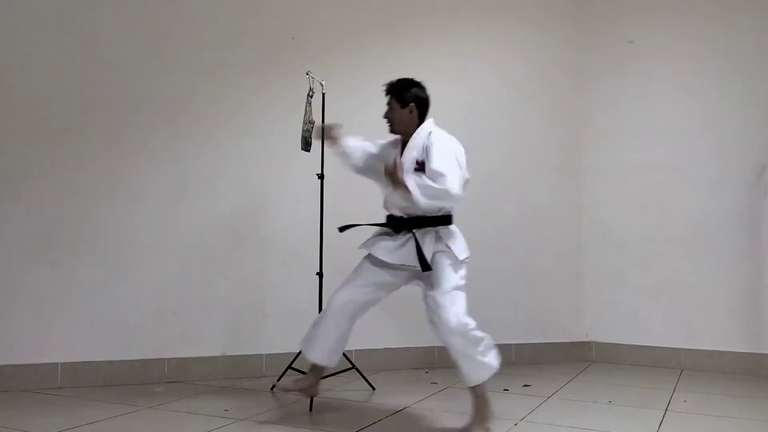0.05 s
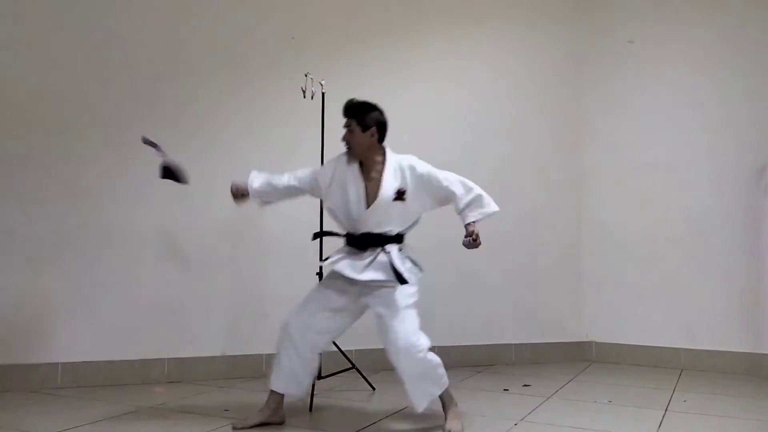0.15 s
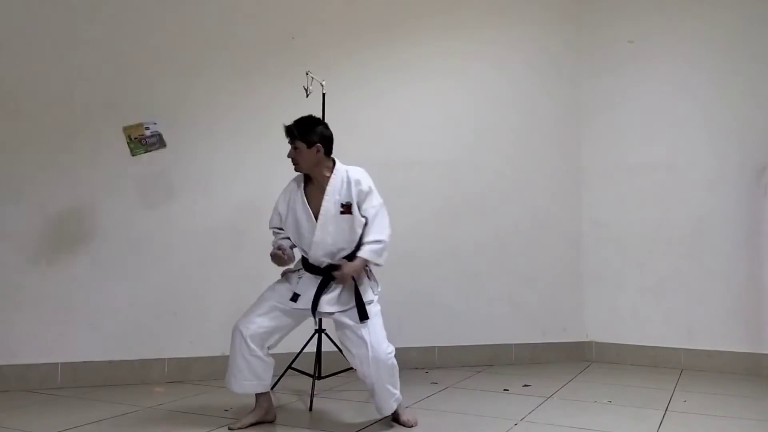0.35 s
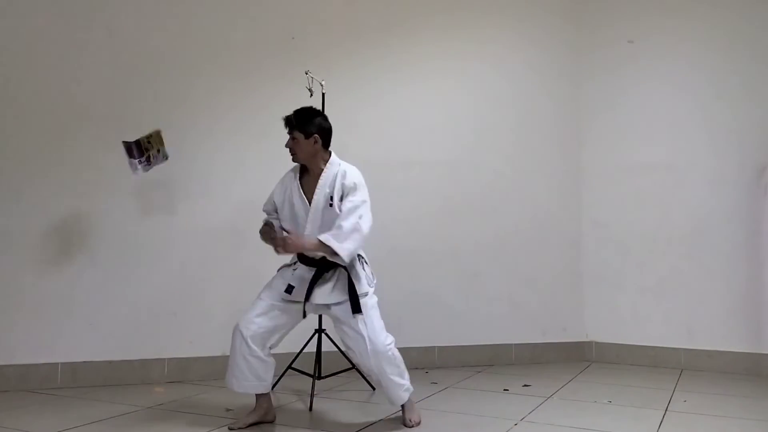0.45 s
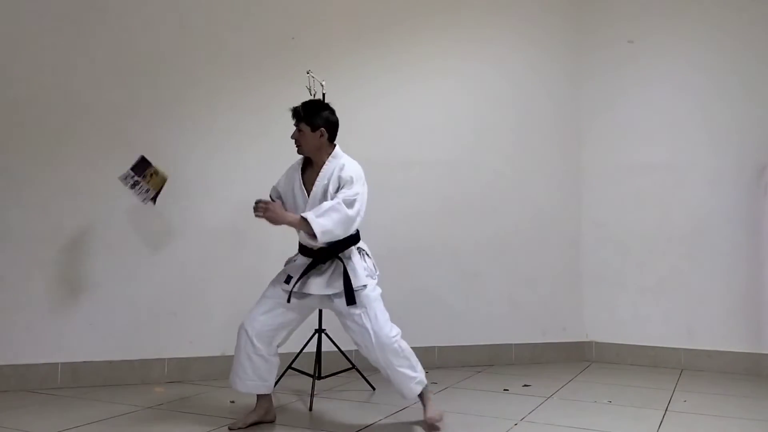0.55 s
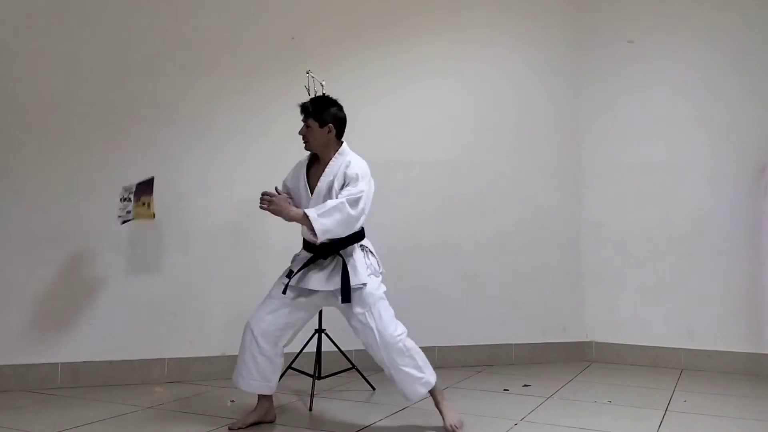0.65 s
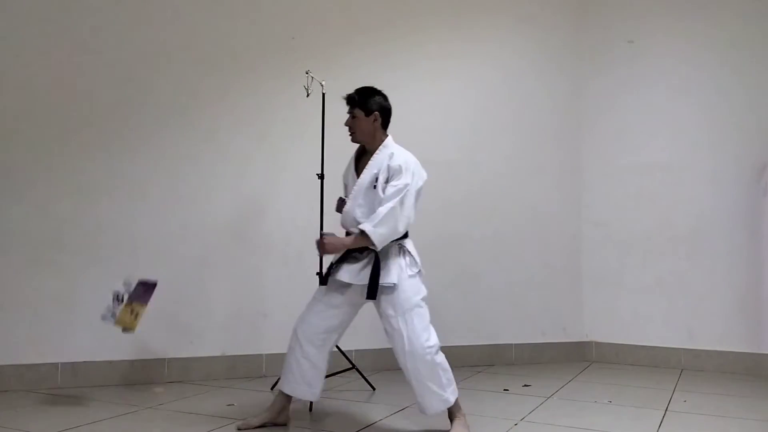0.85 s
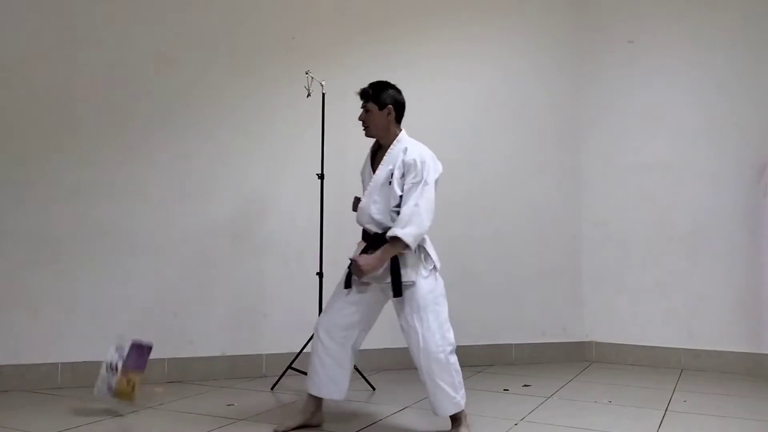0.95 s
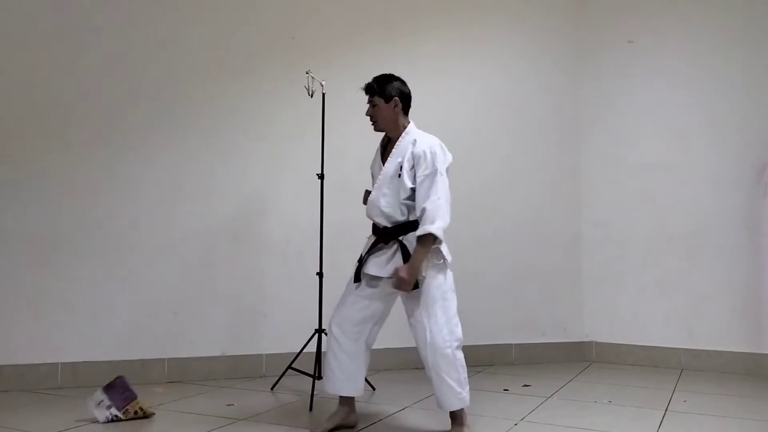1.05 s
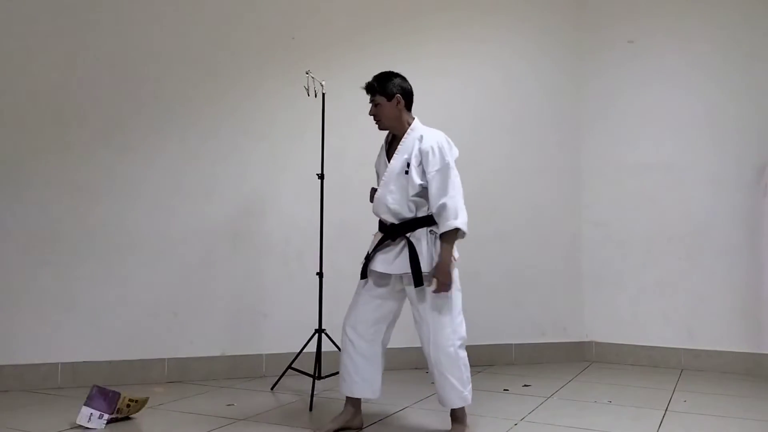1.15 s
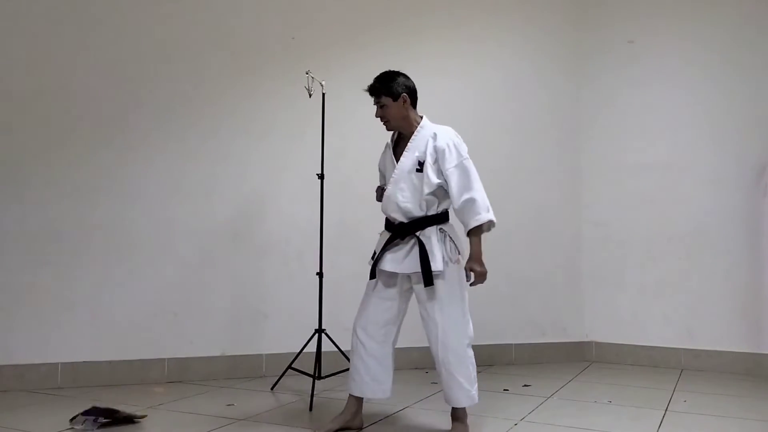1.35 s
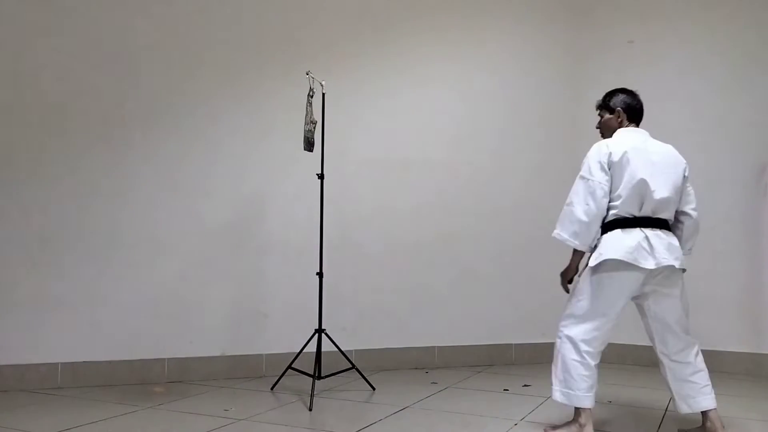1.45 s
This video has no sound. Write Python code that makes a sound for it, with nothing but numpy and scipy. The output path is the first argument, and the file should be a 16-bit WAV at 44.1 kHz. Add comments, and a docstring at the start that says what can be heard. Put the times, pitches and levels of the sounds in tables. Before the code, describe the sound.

A punch cracks into a paper bundle, which then slaps onto a tiled floor.

```python
"""A karate punch into paper

A fist smacks a hanging bundle of paper off its stand in a bare, tiled room. The sleeve swishes,
the paper cracks and flaps away, bare feet thud and the cotton suit snaps. After a soft sliding hiss
the bundle lands edge first and slaps flat. Each hit is a short burst of crinkly noise, given its
own tone by a filter, and the hard walls ring after it."""
import sys
import numpy as np
from scipy import signal
from scipy.fft import rfft, irfft
from scipy.io import wavfile

SR = 44100
rng = np.random.default_rng(int(sys.argv[2]) if len(sys.argv) > 2 else 0)


def output_pcm(signal):
    """Save a mono or channel-first signal as 16-bit PCM at the path in sys.argv[1].

    Samples are clipped to [-1, 1] before scaling.
    """
    pcm = np.clip(np.atleast_2d(signal).T, -1, 1) * 32767
    wavfile.write(sys.argv[1], SR, np.round(pcm).astype(np.int16))


N = 66150
T = np.arange(N) / SR


def punch(walls):
    """The fist crushes the paper and tears it from its clip; air pops out and loose sheets whip over."""
    # when each sound happens: t/s, level/dB, rise/s, decay/s
    cracks = [(0.1992, -12, 0.00042, .005), (0.2027, -11, 0.00055, 0.004), (.208, -16.5, 0.00029, 0.0053),
              (0.253, -28, .004, 0.0095)]
    pops = [(0.1994, -17.5, 0.00073, 0.0027), (0.2089, -17.5, 0.00085, 0.0047), (.227, -22, 0.0012, 0.0034)]
    flaps = [(.286, -27, .0006, .0012), (.2893, -32, .0005, .001)]
    # the tone of each sound: f/Hz, level/dB
    crack_tone = [(100, -16), (300, 2), (900, -3), (1400, -10), (1950, -4), (2650, 6), (3150, 0.5),
                  (3700, 6.5), (4700, -1.5), (7000, -1), (15000, -3)]
    pop_tone = [(70, -35.5), (160, -13), (240, -8), (330, 0), (410, 3), (520, -3.5), (720, 4), (1020, -2),
                (1500, -5.5), (3000, -32.5), (9000, -49)]
    flap_tone = [(200, 1.5), (900, -8.5), (2000, 7.5), (7000, 10), (15000, -0.5)]
    return (bursts(walls, cracks, crack_tone, direct_db=2)
            + bursts(walls, pops, pop_tone, direct_db=-5.5)
            + bursts(walls, flaps, flap_tone, direct_db=15.5))


def puff():
    """The blow shoves a short, low wave of air straight at the microphone."""
    centre_s, pitch_hz, width_s = .211, 91, 0.004
    age = T - centre_s
    return undb(-40) * np.sin(2 * np.pi * pitch_hz * age) * np.exp(-(age / width_s) ** 2)


def landing(walls):
    """The bundle hits the tiles, the cover slaps flat and the pages settle."""
    # the bundle's hits and the cover's slap: t/s, level/dB, rise/s, decay/s
    hits = [(1.1238, -25, .0006, .012), (1.132, -21, .007, .009), (1.167, -30, .002, .01),
            (1.218, -41, .001, .003), (1.245, -37, .01, .02), (1.275, -38, .001, .005)]
    slaps = [(1.131, -19, 0.0093, 0.0031)]
    # the tone of each sound: f/Hz, level/dB
    hit_tone = [(60, -38), (150, -15.5), (280, -3), (400, -10.5), (510, -1), (625, -1), (730, -3), (870, 2),
                (990, -3), (1230, -0.5), (1950, -5), (3000, -1.5), (3900, 2.5), (4700, -4), (7000, -8),
                (15000, -4)]
    slap_tone = [(200, -50), (2000, -27.5), (4000, -1), (7000, 4), (15000, -3)]
    return bursts(walls, hits, hit_tone, direct_db=-1.5) + bursts(walls, slaps, slap_tone, direct_db=6.5)


def fighter(walls):
    """Bare feet strike the tiles, body weight thumps the floor, and the cotton suit swishes and snaps."""
    # when each sound happens: t/s, level/dB, rise/s, decay/s
    steps = [(0.27, -25, 0.01, 0.017), (0.292, -23.5, 0.0011, .01), (0.324, -30.5, 0.0018, 0.055)]
    thumps = [(0.273, -30.5, 0.0029, 0.0059), (.31, -29.5, 0.0052, 0.05), (.58, -53.5, 0.0066, 0.012),
              (.768, -56.5, 0.006, 0.0036)]
    swishes = [(0.131, -36, 0.15, 0.0049), (0.603, -50, 0.0092, 0.018), (0.716, -54.5, 0.0032, 0.025),
               (0.766, -43.5, 0.0076, 0.0089), (.82, -53, 0.017, 0.075)]
    # the tone of each sound: f/Hz, level/dB
    step_tone = [(60, -49), (160, -1), (240, 18), (380, 11), (600, 9.5), (900, 6.5), (1200, -1.5),
                 (1800, -13), (4000, -9.5), (12000, -46)]
    thump_tone = [(30, -44.5), (55, -20), (72, -12.5), (90, 1.5), (110, -13), (135, -2), (165, -11),
                  (400, -72), (2000, -66)]
    cloth_tone = [(60, -15), (250, -14), (650, -5.5), (900, 2.5), (1350, 2.5), (2000, -3.5), (3800, -1),
                  (7000, -9), (11000, -10.5), (15000, -12)]
    return (bursts(walls, steps, step_tone, direct_db=0)
            + bursts(walls, thumps, thump_tone, direct_db=0.5)
            + bursts(walls, swishes, cloth_tone, direct_db=0.5))


def sliding():
    """A foot brushes over the tiles; later the pages of the landed bundle settle with a soft, dull rustle."""
    # the tone of the foot and of the settling pages: f/Hz, level/dB
    foot_tone = [(100, -30.5), (270, -1.5), (500, -23), (1400, -9), (3000, 1.5), (6500, 5), (15000, 5)]
    page_tone = [(200, -12), (1500, -8), (3800, 0), (7000, -2), (15000, -12)]
    fade_start_s, decay_s = 1.13, .04
    foot = ramp(start_s=0.96, length_s=0.089) * np.exp(-np.maximum(T - fade_start_s, 0) / decay_s)
    pages = ramp(start_s=1.33, length_s=.07)
    return undb(-41) * foot * hiss(foot_tone) + undb(-57) * pages * hiss(page_tone)


def bursts(walls, events, tone, direct_db):
    """Each contact is a crinkly burst that swells, dies away and echoes round the room."""
    total = np.zeros(N)
    for start, db, rise, decay in events:
        shape = ramp(start, rise) * np.exp(-np.maximum(T - start - rise, 0) / decay)
        total += undb(db) * heard_in(walls, pitchless_burst(shape), direct_db)
    tone_filter = unit(colour(signal.unit_impulse(N), tone))
    return convolve(total, tone_filter) * np.sqrt(SR / 100)  # a level is energy spread over 10 ms


def pitchless_burst(shape, passes=2):
    """A short contact has no pitch, so its frequencies are evened out until none sticks out."""
    dip_db = 0.5  # only dips below this level remain in the spectrum
    burst = crinkle() * np.sqrt(shape)  # each pass adds part of the rest of the shape
    for _ in range(passes):
        spectrum = rfft(unit(burst))
        burst = irfft(spectrum / (np.abs(spectrum) + undb(dip_db)), N) * shape ** (.5 / passes)
    return unit(burst)


def crinkle():
    """Tiny creases snap over the rush of rubbing fibres."""
    creases_per_s, spread_db = 2500, 2
    snaps = (rng.random(N) < creases_per_s / SR) * rng.choice([-1, 1], N)
    sizes = undb(spread_db * np.minimum(rng.exponential(size=N), 4))
    return undb(-0.5) * unit(snaps * sizes) + unit(rng.standard_normal(N))


def room(count=12):
    """The ring of the hard walls: bands of noise from low to high, and how each one dies away."""
    # how long the room takes to fade by 60 dB: f/Hz, t/s
    ring_times = [(80, 0.36), (250, 0.42), (700, 0.68), (1500, 0.59), (3800, 0.62), (7000, 0.46),
                  (14000, 0.47)]
    hz = np.arange(N // 2 + 1) * SR / N
    centres = np.geomspace(60, 16000, count)
    noise = rfft(rng.standard_normal(N))
    shares = [along(list(zip(centres, band)), hz) for band in np.eye(count)]
    bands = np.array([irfft(noise * np.sqrt(share), N) for share in shares])
    decays = np.exp(-np.log(1000) * T / along(ring_times, centres)[:, None])
    return bands, decays


def heard_in(walls, sound, direct_db):
    """Sound arrives directly, then as early echoes and a long ring; each spot has its own echoes."""
    gap_s, early_decay_s, early_db = 0.0024, 0.011, 2
    bands, decays = walls
    tail = np.sum(np.roll(bands, rng.integers(N), axis=1) * decays, axis=0)
    arrived = ramp(gap_s, gap_s)  # echoes need time to come back from the walls
    echoes = rng.standard_normal(N)
    early = echoes * np.abs(echoes) * np.exp(-T / early_decay_s)
    response = unit(tail * arrived) + undb(early_db) * unit(early * arrived)
    response[0] += undb(direct_db)
    return convolve(sound, unit(response))


def room_air():
    """The air of the room makes a faint, steady rush."""
    # the tone of the air: f/Hz, level/dB
    air_tone = [(25, -11), (70, 3), (140, -6), (300, -4), (700, -0.5), (1600, -10.5), (3800, -11),
                (7000, -10.5), (15000, -30.5)]
    return undb(-64) * hiss(air_tone)


def hiss(tone):
    """Steady noise with the given tone and an average power of one."""
    return unit(colour(rng.standard_normal(N), tone)) * np.sqrt(N)


def colour(sound, tone, size=4096):
    """Make each frequency louder or softer, following a table of f/Hz, level/dB."""
    hz = np.arange(size // 2 + 1) * SR / size
    cepstrum = irfft(np.log(undb(along(tone, hz))))
    # fold the second half onto the first, so the filter never rings before the sound starts
    cepstrum[1:size // 2] *= 2
    cepstrum[size // 2 + 1:] = 0
    return convolve(sound, irfft(np.exp(rfft(cepstrum))))


def convolve(sound, response):
    """Pass a sound through a filter or room, given its response to one click."""
    return signal.fftconvolve(sound, response)[:N]


def along(points, hz):
    """Read between the rows of a frequency table, giving every octave equal space."""
    frequencies, values = np.array(points, float).T
    return np.interp(np.log(np.maximum(hz, 1)), np.log(frequencies), values)


def ramp(start_s, length_s):
    """Rise in a straight line from 0 to 1, then stay there."""
    return np.clip((T - start_s) / length_s, 0, 1)


def unit(sound):
    """Scale to an energy of one."""
    return sound / np.sqrt(np.sum(sound ** 2) + 1e-18)


def undb(db):
    """Turn decibels into a number to multiply by."""
    return 10 ** (np.asarray(db) / 20)


def scene():
    """All the sources together in one channel, over the room's quiet air."""
    walls = room()
    return (punch(walls) + puff() + fighter(walls) + landing(walls) + sliding() + room_air())[None]


def record(dry):
    """A small microphone dulls the highest treble; the sound drops away abruptly near the end."""
    # the microphone's treble loss: f/Hz, level/dB
    microphone = [(7400, 0), (8300, -10), (9400, -25), (10300, -20), (15000, -16)]
    drop_db, top_hz = -34, 15500
    heard = colour(dry[0], microphone) * undb(drop_db * ramp(start_s=1.425, length_s=.004))
    low_pass = signal.ellip(10, .2, 70, top_hz, fs=SR, output="sos")
    return signal.sosfilt(low_pass, heard)[None]


dry = scene()
out = record(dry)
output_pcm(out)
```